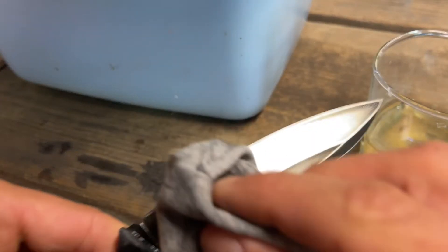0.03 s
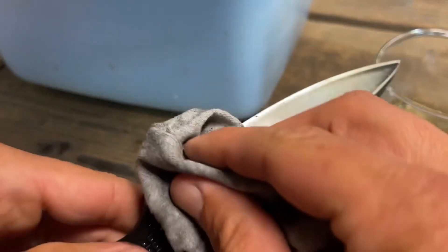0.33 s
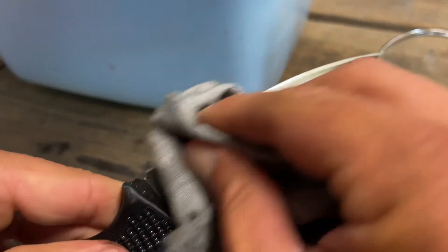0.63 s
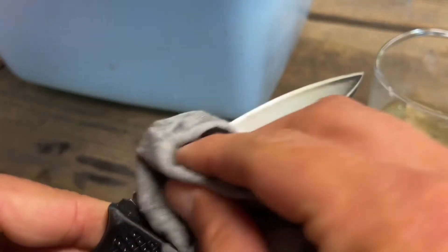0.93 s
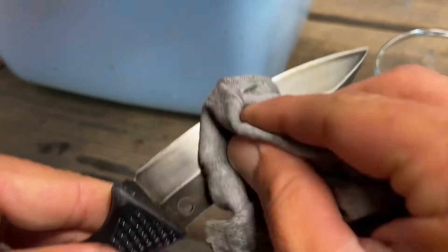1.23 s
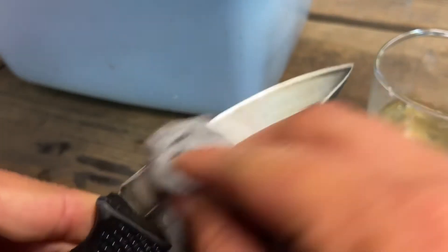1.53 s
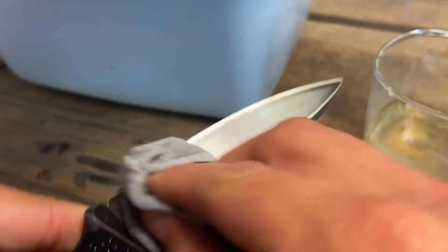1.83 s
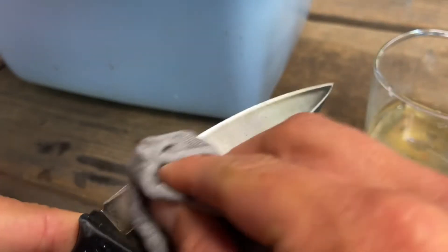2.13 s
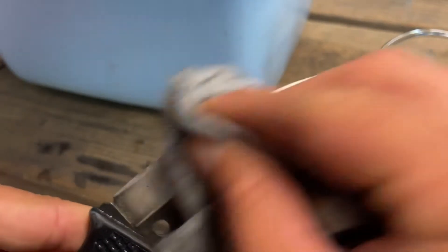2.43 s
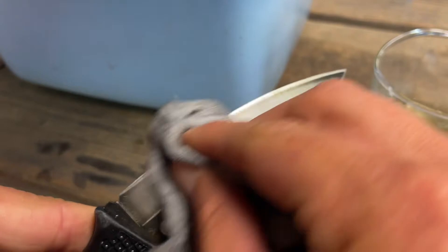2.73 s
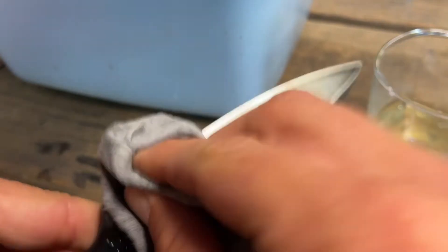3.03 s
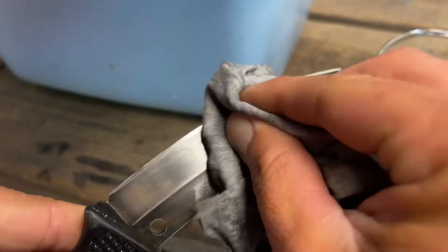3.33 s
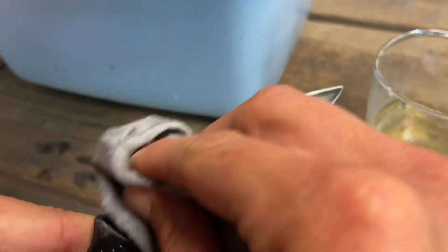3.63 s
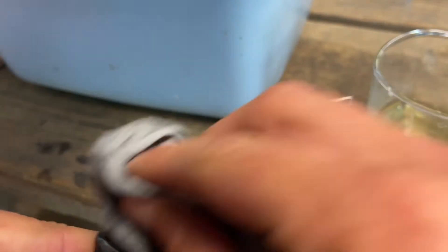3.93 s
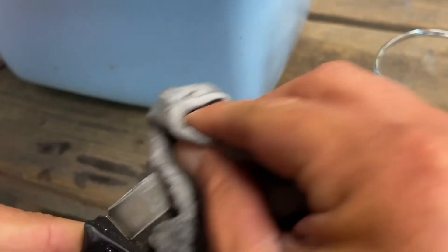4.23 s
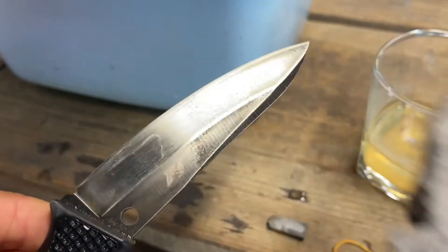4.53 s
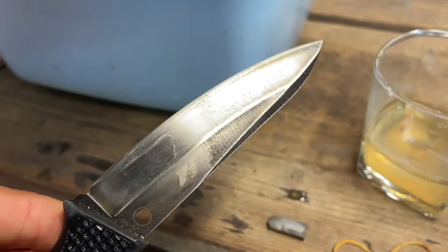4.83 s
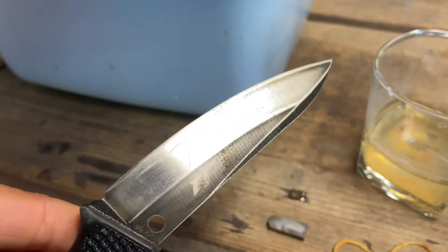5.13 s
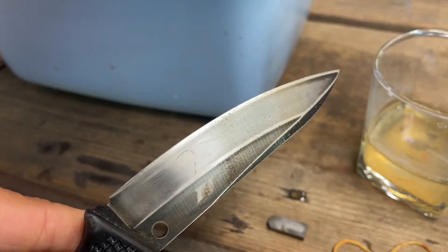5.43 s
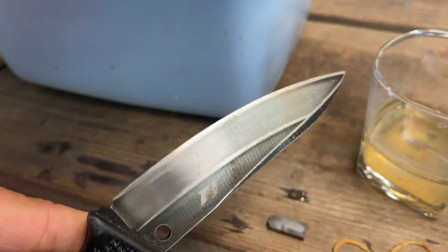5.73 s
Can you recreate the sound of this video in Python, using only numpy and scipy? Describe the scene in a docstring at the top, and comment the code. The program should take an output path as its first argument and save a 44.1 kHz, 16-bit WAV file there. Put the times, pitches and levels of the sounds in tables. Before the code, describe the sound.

Quiet, close swishes of cloth polishing a knife blade, fast at first and then slower, with a low hum and far-off traffic underneath.

```python
"""At a wooden table, close up: a cloth rag rubs a steel knife blade. Thirteen quick strokes, four slow
wipes, then the rag is drawn away. Fibres catch and slip on the steel, hissing with hand speed and
lightly ringing the damped blade; handling leaves faint ticks. Table and room reflect it all.
Underneath: a low hum and the rumble, tyres and engines of distant traffic."""
import sys
import numpy as np
from scipy import signal
from scipy.fft import rfft, irfft
from scipy.io import wavfile

SR = 44100
rng = np.random.default_rng(int(sys.argv[2]) if len(sys.argv) > 2 else 0)


def to_wav(sig):
    """Store sig (one row per channel, or 1-D mono) as 16-bit WAV at the path in sys.argv[1].

    Samples outside -1..1 are clipped; the rate is SR.
    """
    pcm = np.clip(np.atleast_2d(sig), -1, 1) * 32767
    pcm = np.round(pcm).astype(np.int16)
    wavfile.write(sys.argv[1], SR, pcm.T)  # frames by channels


N = 264600
TIME = np.arange(N) / SR
FREQ = np.maximum(np.fft.rfftfreq(N, 1 / SR), 1)


def undb(db):
    """Decibels to gain."""
    return 10 ** (np.asarray(db) / 20)


def unit(x):
    """Scale to rms 1."""
    return x / np.sqrt(np.mean(x ** 2))


def column(values):
    """One row per band or channel."""
    return np.array(values)[:, None]


def over_hz(rows):
    """Interpolate (f/Hz, value) rows over log frequency."""
    hz, value = np.transpose(rows)
    return np.interp(np.log(FREQ), np.log(hz), value)


def shape(x, response):
    """Filter by a frequency response."""
    return irfft(rfft(x) * response, N)


def rolloff(hz, order):
    """Zero-phase low-pass response."""
    return 1 / (1 + (FREQ / hz) ** order)


def resonance(hz, width_hz):
    """One resonance, gain 1 at centre."""
    return 1 / (1 + 1j * (FREQ ** 2 - hz ** 2) / (FREQ * width_hz))


def bump(centre_s, half_s):
    """Gaussian swell, peak 1."""
    return np.exp(-((TIME - centre_s) / half_s) ** 2)


def walk(rate_hz):
    """Smooth random drift, rms 1."""
    return unit(shape(rng.standard_normal(N), rolloff(rate_hz, 4)))


def slips(per_s, spread_db):
    """Fibres letting go at random: impulses, rms 1."""
    hits = (rng.random(N) < per_s / SR) * rng.standard_normal(N)
    return unit(hits * undb(spread_db * rng.standard_normal(N)))


def distant_noise(colour, wide_hz):
    """Stereo noise: bass alike at both ports, treble not."""
    mid, side = shape(rng.standard_normal((2, N)), undb(over_hz(colour)))
    side = shape(side, 0.84 * FREQ / (FREQ + wide_hz))
    return unit(mid + side * column([1, -1]))


# background spectrum: f/Hz, level/dB
FLOOR_SPECTRUM = [(20, -20), (40, -14), (60, -1.5), (90, -5.5), (145, -11.5), (230, -15.5), (450, -20.5),
                  (950, -37.5), (2000, -41), (3400, -51), (9000, -52), (11500, -51), (12700, -59)]
def background(floor_db=-58.5, hum_hz=60.4, hum_db=-63):
    """Steady low noise and a hum of wavering level."""
    floor = undb(floor_db) * distant_noise(FLOOR_SPECTRUM, wide_hz=220)
    hum = np.sqrt(2) * undb(hum_db + 2.7 * walk(3.1)) * np.sin(2 * np.pi * hum_hz * TIME)
    return floor + hum


# tyre spectrum: f/Hz, level/dB
TYRE_SPECTRUM = [(150, -15), (450, 0), (850, -2), (1400, -10), (2200, -22), (8000, -45)]
def tyres(start_db=-68.5, fade_db_per_s=1.46):
    """Far tyre noise, slowly receding."""
    level_db = start_db - fade_db_per_s * TIME + 1.5 * walk(2.6)
    return undb(level_db) * distant_noise(TYRE_SPECTRUM, wide_hz=200.6)


# rag settled, then drawn away: centre t/s, half length/s, level/dB
RUSTLE_SWELLS = [(0.108, 0.26, -77), (4.495, 0.21, -73.5)]
# loose cloth spectrum: f/Hz, level/dB
RUSTLE_SPECTRUM = [(400, -6), (1500, 3), (2800, 0.5), (5800, -2.5), (8500, -6.5), (12500, -12)]
def rustle():
    """Loose folds brush each other, without the blade."""
    fibres = unit(shape(slips(per_s=9000, spread_db=0), undb(over_hz(RUSTLE_SPECTRUM))))
    return fibres * sum(undb(db) * bump(centre, half) for centre, half, db in RUSTLE_SWELLS)


# engine notes: start t/s, end t/s, start f/Hz, end f/Hz, level/dB
ENGINE_NOTES = [(.1, 1.54, 82, 118, -69), (1.302, 2.42, 162.8, 158, -65.5), (2.1, 3.0, 80, 114, -64),
                (2.652, 4.5, 163, 160.2, -65.5), (3.2, 4.35, 111.9, 109, -61), (5.1, 5.75, 80, 92, -62.5)]
def engines():
    """Distant engines: gliding, wavering tones."""
    out = np.zeros(N)
    for start, end, start_hz, end_hz, db in ENGINE_NOTES:
        progress = np.clip((TIME - start) / (end - start), 0, 1)
        hz = (start_hz + (end_hz - start_hz) * progress) * (1 + 0.0165 * walk(8.14))
        swell = np.sqrt(np.abs(np.sin(np.pi * progress))) * undb(db + 3.3 * walk(7.3))
        out += np.sqrt(2) * swell * np.sin(2 * np.pi * np.cumsum(hz) / SR)
    return out


# cloth-on-steel friction spectrum: f/Hz, level/dB
FRICTION_SPECTRUM = [(150, -17), (350, -10), (600, -9.5), (950, -7), (1750, -6.5), (2350, -7.5), (3600, -7),
                     (5000, -7), (7000, -7.5), (8200, -4), (9200, 0.5), (11400, 4), (12400, -5.5),
                     (13300, -16)]
# damped blade modes: f/Hz, width/Hz, level/dB re friction
BLADE_MODES = [(1292, 58, -5.5), (1830, 160, -17.5), (2784, 45, -2.5), (2990, 80, -9), (3630, 150, -10.5),
               (4770, 130, -9), (5840, 160, -9), (8630, 130, -20), (11330, 140, -14)]
def rubbing(drive):
    """Fibre slips, bunched by folds, ring the blade. Drive: gains of bands body, rasp, sheen, fizz."""
    grip = undb(0.9 * walk(51) + walk(400))
    friction = slips(per_s=26000, spread_db=2) * grip
    steel = 1 + sum(undb(db) * resonance(hz, width) for hz, width, db in BLADE_MODES)
    colour = undb(over_hz(FRICTION_SPECTRUM)) * steel
    crossovers = [rolloff(hz, 12) for hz in (2200, 7500, 10300)]
    bands = np.diff(crossovers, axis=0, prepend=0, append=1)
    gains = undb(column([-0.5, -0.8, -0.8, -1.2])) * drive
    return sum(gain * unit(shape(friction, colour * band)) for gain, band in zip(gains, bands))


# duller tone of a barely moving rag: level/dB for body, rasp, sheen, fizz
LIGHT_CONTACT_DB = [1.5, 0, -2, -4.5]
# strokes: start t/s, fastest t/s, end t/s, rasp drive/dB, body/dB re rasp, fizz/dB re rasp
QUICK_STROKES = [ (0.468, 0.588, 0.64, -50, -5.5, -3.5), (0.672, 0.769, 0.82, -60, -7, -7),
                 (0.858, 0.911, .94, -51, -5, -12), (0.97, 1.01, 1.04, -50, -10.5, -0.5),
                 (1.074, 1.119, 1.157, -42.5, -8, -6), (1.183, 1.214, 1.254, -42.5, -11, 2),
                 (1.287, 1.33, 1.38, -40.5, -9, -5), (1.397, 1.448, 1.484, -48.5, -4, 2),
                 (1.524, 1.562, 1.5957, -41.5, -9, -1.5), (1.634, 1.691, 1.724, -48, -4, -0.5),
                 (1.756, 1.81, 1.869, -49, -6.5, 2), (1.898, 1.92, 1.998, -55.5, -4, 0.5),
                 (2.027, 2.112, 2.2215, -50, -6, 2)]
def strokes(sheen_db=0.3, creep_db=-27.5):
    """Band drive of quick strokes: the hand speeds up and stops; the rag creeps as it turns."""
    speed_power = 1.51 * column([1.15, 1.08, 0.95, 0.9])  # body needs the fastest rub
    creep_gain = undb(creep_db + column(LIGHT_CONTACT_DB))
    drive = np.zeros((4, N))
    for start, fastest, end, db, body_db, fizz_db in QUICK_STROKES:
        speed = np.sin(np.pi / 2 * np.interp(TIME, [start, fastest, end], [0, 1, 0]))
        creep = creep_gain * bump((start + end) / 2, 0.92 * (end - start))
        full_db = db + column([body_db, 0, sheen_db, fizz_db])
        drive += undb(full_db) * (speed ** speed_power + creep)
    return drive


# rumble swells: centre t/s, half length/s, level/dB
RUMBLE_SWELLS = [(1.547, 0.51, -62), (2.97, 0.24, -54.5), (3.431, 0.084, -57), (3.834, 0.22, -59.5)]
# rumble spectrum: f/Hz, level/dB
RUMBLE_SPECTRUM = [(40, -16), (80, -1.5), (120, 4), (200, 0.5), (300, -9.5), (600, -28), (1500, -46.5),
                   (4000, -68.5)]
def traffic_rumble():
    """Low swells from distant traffic."""
    swells = sum(undb(db) * bump(centre, half) for centre, half, db in RUMBLE_SWELLS)
    return swells * distant_noise(RUMBLE_SPECTRUM, wide_hz=260)


# ticks: t/s, peak level/dB, f/Hz, width/Hz, length/s
HANDLING_TICKS = [(2.268, -63, 4210, 6120, 0.0036), (2.951, -57, 7540, 12200, 0.0089),
                  (3.383, -67.5, 3920, 3970, 0.0063), (3.462, -68.5, 8400, 7000, 0.018),
                  (3.839, -64.5, 1550, 1500, 0.018), (5.225, -66, 6900, 9050, .014),
                  (5.286, -47.5, 11500, 1400, .00045), (5.579, -66.5, 6900, 7000, .012),
                  (5.75, -65.5, 8140, 9000, 0.026), (5.96, -69, 7850, 8000, 0.013)]
def ticks():
    """Cloth and fingers catch briefly on the knife."""
    out = np.zeros(N)
    for start, db, hz, width, length in HANDLING_TICKS:
        age = np.maximum(TIME - start, 0) / length
        burst = rng.standard_normal(N) * age * np.exp(-2 * age)
        tick = shape(burst, resonance(hz, width) ** 2)
        out += undb(db) * tick / np.abs(tick).max()
    return out


# brighter glide over the flat of the blade: level/dB for body, rasp, sheen
GLIDE_DB = [-3.5, 0.5, 1]
# growth with pressure: exponent for body, rasp, sheen, fizz
PRESSURE_POWERS = [1, 1.1, 1.22, 0.67]
# wipes: start t/s, firmest t/s, end t/s, rasp drive/dB,
# landing and stop pressure/dB re firmest, fizz/dB re rasp
SLOW_WIPES = [ (2.536, 2.687, 2.8, -50.5, -22.5, -5, -.5), (2.982, 3.189, 3.255, -50, -21, -2, 2),
              (3.527, 3.61, 3.728, -55.5, -10.5, -3.5, 6.5), (3.927, 4.191, 4.296, -56, -15.5, -13.5, 1.5)]
def wipes(attack_s=0.02, release_s=0.032, bend=1.33, trail_db=-28, trail_s=0.043):
    """Band drive of slow wipes: the rag lands lightly, presses, eases and stops with a short brush."""
    drive = np.zeros((4, N))
    for start, firmest, end, db, landing_db, stop_db, fizz_db in SLOW_WIPES:
        full_db = db + column([*GLIDE_DB, fizz_db])
        landing = np.interp(TIME, [start + attack_s, firmest], [1, 0]) ** bend
        easing = np.interp(TIME, [firmest, end - release_s], [0, 1]) ** bend
        pressure_db = landing_db * landing + stop_db * easing
        contact = np.interp(TIME, [start, start + attack_s, end - release_s, end], [0, 1, 1, 0]) ** 2
        drive += contact * undb(full_db + column(PRESSURE_POWERS) * pressure_db)
        drive += undb(full_db + trail_db + column(LIGHT_CONTACT_DB)) * bump(end, trail_s)
    return drive


# paths off table, tub and hands: left lag/ms, right lag/ms, level/dB
ECHO_PATHS = [(.45, 0.849, -13), (1.399, 1.08, -11), (2.102, 2.5, -16), (3.9, 3.3, -12)]
def close_echoes(x, sway_ms, dull_hz):
    """Short paths stretch as the hands move, colouring each stroke differently."""
    dulled = shape(x, rolloff(dull_hz, 8))
    out = np.zeros((2, N))
    for left_ms, right_ms, db in ECHO_PATHS:
        lag_ms = column([left_ms, right_ms]) + sway_ms * walk(2.84)
        out += undb(db) * np.interp(TIME - lag_ms / 1000, TIME, dulled)
    return out


def reflections(x, gap_s, t60_s, db, dull_hz):
    """Decaying diffuse echoes, low-passed, different at each port."""
    response = rng.standard_normal((2, N)) * (TIME > gap_s) * undb(-60 * TIME / t60_s)
    response /= np.sqrt(np.sum(response ** 2, axis=1, keepdims=True))
    return undb(db) * shape(x, rfft(response) * rolloff(dull_hz, 8))


def scene():
    """Rag and knife, their echoes, background and traffic."""
    knife = rubbing(strokes() + wipes()) + rustle() + ticks()
    table = reflections(knife, gap_s=0.0011, t60_s=0.015, db=-14, dull_hz=13900)
    room = reflections(knife, gap_s=0.008, t60_s=0.23, db=-26, dull_hz=7560)
    echoes = close_echoes(knife, sway_ms=0.19, dull_hz=8140)
    return knife + echoes + table + room + background() + tyres() + engines() + traffic_rumble()


# port balance: f/Hz, left minus right level/dB
BALANCE_DB = [(60, -1.5), (150, -3.5), (400, -3), (1150, -3), (2100, -5), (3800, -5), (6800, -3), (9000, 0)]
# port phase: f/Hz, left lead/rad
LEAD_RAD = [(1500, 0), (3100, -.8), (4200, -.3), (7800, -.9), (8900, .3), (9500, 1.6), (10350, 3.14),
            (11000, 4.7), (11700, 5.8), (12800, 7.3)]
def record(dry, top_hz=12800):
    """Two unlike microphone ports, the right nearer the rag; top treble cut."""
    split = column([0.5, -0.5])
    ports = undb(split * over_hz(BALANCE_DB)) * np.exp(1j * split * over_hz(LEAD_RAD))
    top_cut = signal.ellip(8, 0.2, 70, top_hz, fs=SR, output="sos")
    return signal.sosfilt(top_cut, shape(dry, ports))


dry = scene()
out = record(dry)
to_wav(out)
```